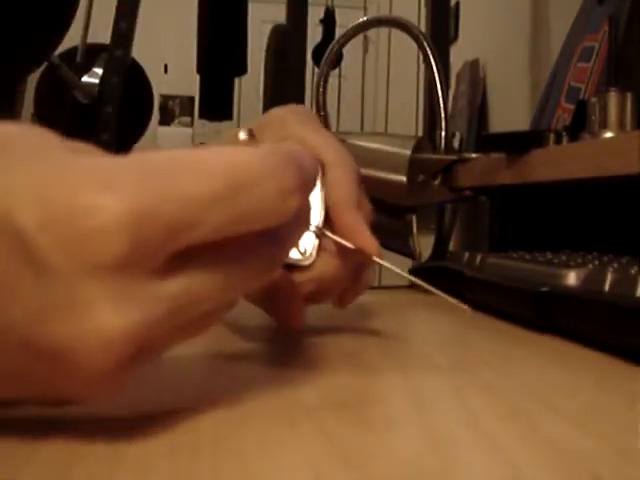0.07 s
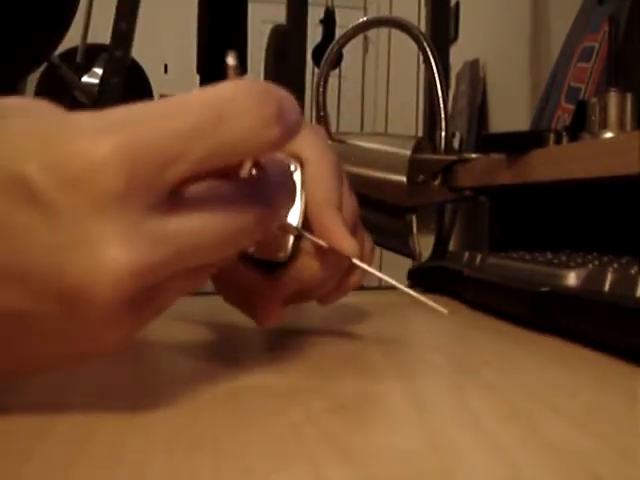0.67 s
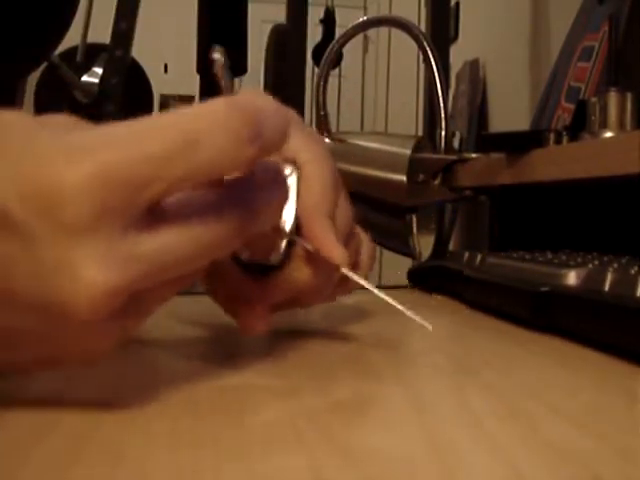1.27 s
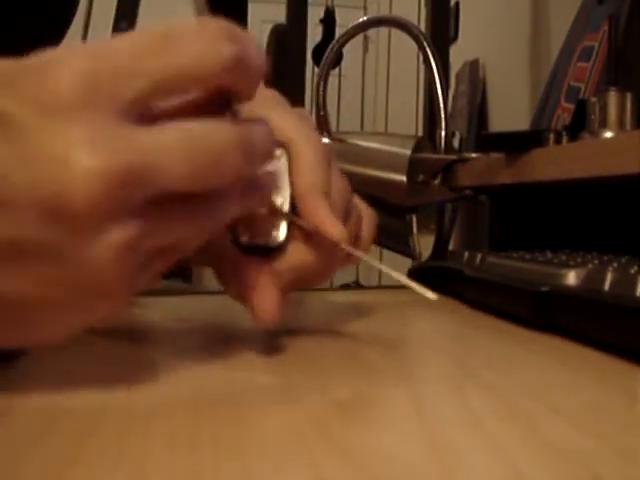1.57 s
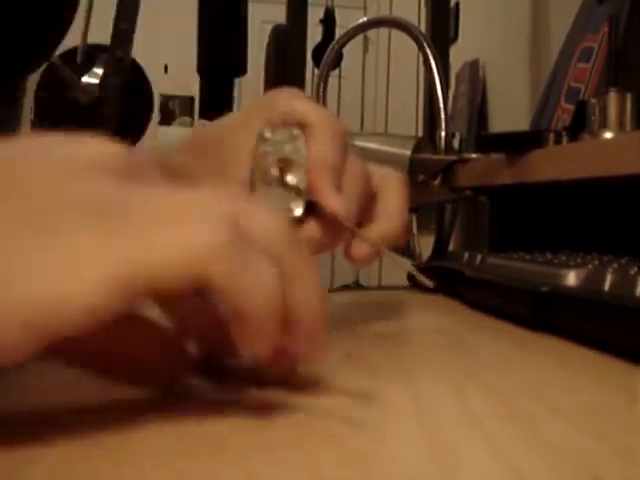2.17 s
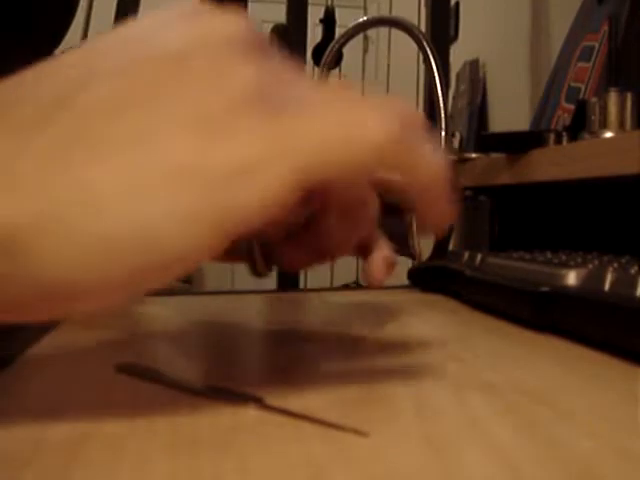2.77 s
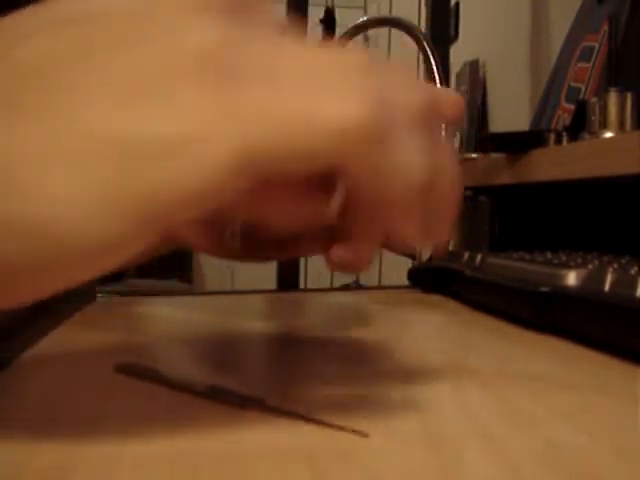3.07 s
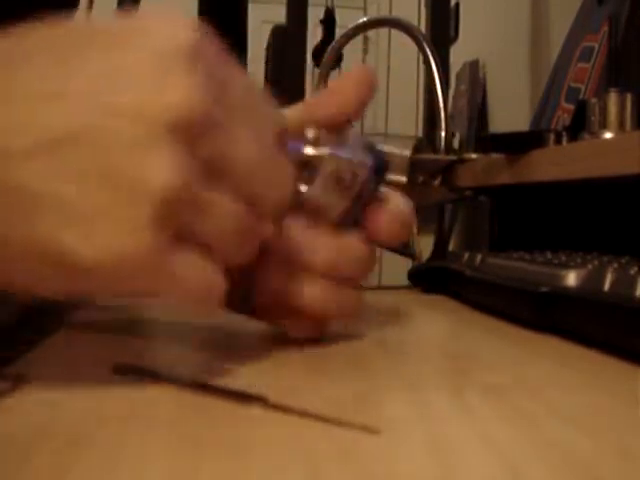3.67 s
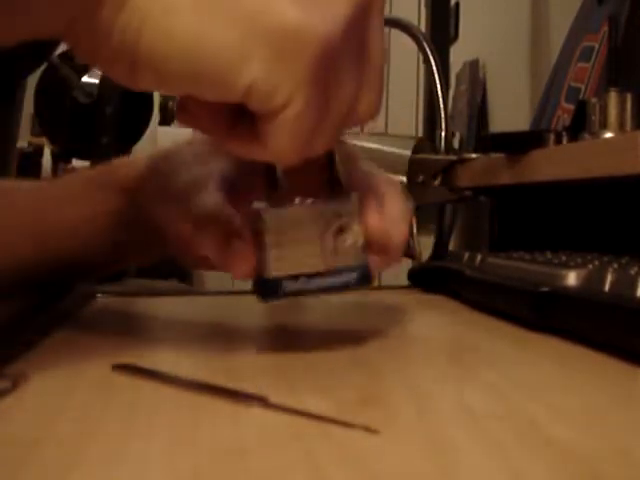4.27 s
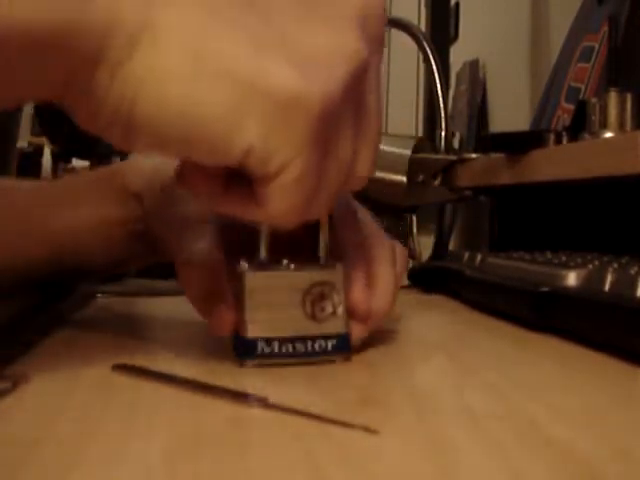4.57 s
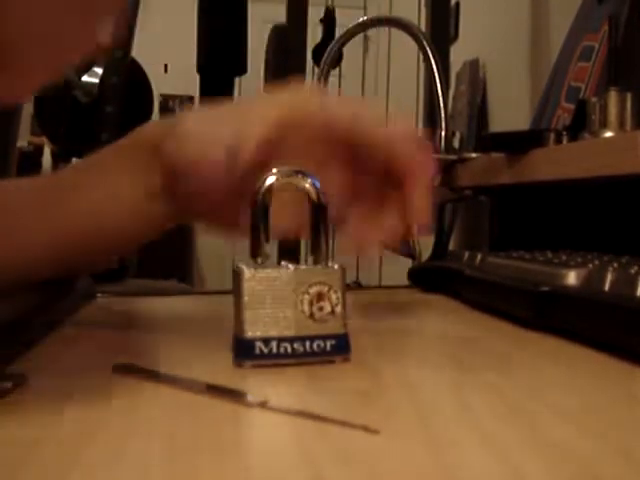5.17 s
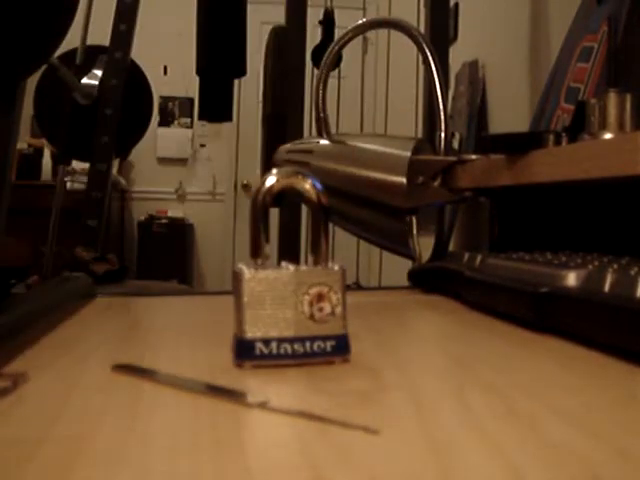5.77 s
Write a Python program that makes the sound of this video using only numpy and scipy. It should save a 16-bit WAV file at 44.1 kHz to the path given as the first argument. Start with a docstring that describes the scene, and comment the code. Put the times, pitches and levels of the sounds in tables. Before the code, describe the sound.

Faint metallic ticks and tiny scrapes come from a pick working the pins of a padlock. The pick clatters onto a wooden desk, the shackle springs open with a sharp, loud snap, and a small wrench bounces and rattles to rest. The lock is then stood on the desk with a dull knock. The microphone is close, in a quiet, slightly echoing room with a humming fan.

```python
"""A padlock is picked on a wooden desk, just in front of a small camera in a quiet room.
Pins tick and scrape, the pick drops, the shackle springs open, the tension wrench rattles to rest,
and the lock is stood on the desk. Each impact is a click and brief chatter that excite damped modes.
A fan hums and the camera whines and ticks faintly; its fast limiter compresses the loudest hits,
so the room's reverberation swells up behind them."""
import sys
import numpy as np
from scipy import signal
from scipy.fft import rfft, irfft
from scipy.io import wavfile

SR = 44100
rng = np.random.default_rng(int(sys.argv[2]) if len(sys.argv) > 2 else 0)


def generate_wav(signal):
    """Clip the signal to [-1, 1] and save it as 16-bit WAV at the path in sys.argv[1]."""
    frames = np.transpose(np.atleast_2d(signal))
    scaled = np.clip(frames, -1, 1) * 32767
    pcm = np.round(scaled).astype(np.int16)
    wavfile.write(sys.argv[1], SR, pcm)


N = 265923

# Single pin clicks: t/s, relative level/dB, tilt/(dB/octave), pin f/Hz
PIN_TICKS = [(0.1504, -41, 1, 6760), (.3078, -39.5, 0, 4560), (.4596, -32, 2.5, 4770),
             (.8612, -36, -4.5, 4500), (1.1173, -40, 1, 4810), (1.1458, -22, -0.8, 4450),
             (1.5511, -21.5, -3.5, 5240), (2.8652, -34, -4, 4910)]
# Drags through the keyway: t/s, length/s, relative level/dB, tilt/(dB/octave), pin f/Hz
PIN_SCRAPES = [(0.4267, .018, -38, 1, 4700), (1.658, .006, -40.5, -2.5, 7540), (1.767, .055, -38, 5, 8000),
               (2.92, .02, -33, 1, 4800)]
# Contact spectrum of a pin: f/Hz, relative level/dB
PIN_FORCE = [(60, -22), (300, -12.5), (1000, -0.5), (1700, -3), (2600, -12.5), (3400, -4), (4400, 2.5),
             (6300, 0), (8500, -3), (10000, -7.5)]
# Modes of the lock body: f/Hz, relative level/dB, T60/s
LOCK_MODES = [(4270, -6.5, 0.022), (4900, -10, .025), (7430, -49, 0.026), (8000, -22, 0.017),
              (8460, -1, 0.013), (9730, 7, 0.014)]


def pins(catch_gap_s=.015, jitter_s=.001, uneven_db=1.5, tick_t60=.014, catch_t60=.022):
    """Stick-slip friction: the tool catches almost periodically; catches and clicks ring pin and lock."""
    rows = [(s, db, tilt, tick_t60, hz) for s, db, tilt, hz in PIN_TICKS]
    for start, length, db, tilt, hz in PIN_SCRAPES:
        catches = np.arange(start, start + length, catch_gap_s)
        for s, (late, strong) in zip(catches, rng.standard_normal((10, 2))):
            rows.append((s + jitter_s * late, db + uneven_db * strong, tilt, catch_t60, hz))
    return spot_impacts(rows, PIN_FORCE, LOCK_MODES, ring_db=-11.5, chatter=3.8,
                        spot_db=-.5, spot_t60=.016)


# The latch lets go and the shackle hits its stop: t/s, level/dB, tilt/(dB/octave), chatter T60/s
SHACKLE_SNAPS = [(2.5131, -22, -8, 0.013), (2.5178, -15, 13, 0.025), (2.5216, 4.5, 2.5, 0.014),
                 (2.5248, -3, 7.5, 0.0055)]
# Contact spectrum of the shackle: f/Hz, relative level/dB
SHACKLE_FORCE = [(60, -34), (400, -29), (1200, -7), (2200, 0.5), (3500, -5), (5100, 1), (6200, -7),
                 (7500, 2.5), (8200, -2), (9000, -8), (10000, -22.5)]


def shackle(ring_db, chatter):
    """Release of elastic energy: the sprung shackle strikes the lock body in a tight cluster of hits."""
    return impacts(SHACKLE_SNAPS, SHACKLE_FORCE, LOCK_MODES, ring_db, chatter)


# Pick bounces: t/s, tip level/dB, handle delay/s, handle level/dB, handle tilt/(dB/octave)
PICK_BOUNCES = [(2.1774, 2, .0062, 8, -0.5), (2.204, -13, 0.01, -13.5, 2.5), (2.226, -22, 0.013, -9.5, 0),
                (2.2564, -13, 0.0029, -13.5, 0.5), (2.28, -13, .009, -16, -4.5)]
# Contact spectrum of the pick: f/Hz, relative level/dB
PICK_FORCE = [(60, -26), (150, -17), (250, -4.5), (450, 2), (1000, 5), (1900, 8), (3200, 4), (4800, 1),
              (6500, -3), (7700, -12), (8700, -13), (10000, -8.5)]
# Modes of the pick and of the desk: f/Hz, relative level/dB, T60/s
PICK_MODES = [(3575, -21, .1), (4470, -16, .08), (5965, -8, .15), (8610, -12, .15)]
DESK_MODES = [(349.4, -15, 0.17), (506, -15, 0.065), (603, -7.5, 0.048), (933, -10, 0.062),
              (1017, -7, 0.051), (1420, -7.5, 0.071), (1927, -1, 0.027), (2480, -6, 0.031),
              (3214, -4, 0.019)]


def dropped_pick(tip_t60=.053, handle_t60=.021, tilt_db_per_octave_per_s=75):
    """Two-point impact: the springy tip lands and buzzes, then the handle slaps down."""
    rows, dropped_s = [], PICK_BOUNCES[0][0]
    for s, tip_db, delay, handle_db, handle_tilt in PICK_BOUNCES:
        tip_tilt = tilt_db_per_octave_per_s * (s - dropped_s)  # the buzz thins as the bounces get lower
        rows.append((s, tip_db, tip_tilt, tip_t60))
        rows.append((s + delay, handle_db, handle_tilt, handle_t60))
    return rattle(rows, PICK_FORCE, DESK_MODES + PICK_MODES, ring_db=-18.5, chatter=9.8,
                  after_db=-4, after_s=.0066)


# The tension wrench tumbles and finally tips over: t/s, level/dB, tilt/(dB/octave)
WRENCH_BOUNCES = [(3.2288, -11, -2), (3.2545, -19.5, -5.5), (3.267, -20.5, -2.5), (3.2852, -13.5, 1.5),
                  (3.3213, -18, 8), (3.3487, -14.5, -1), (3.3965, -21.5, -1.5), (3.5452, -25.5, -3),
                  (3.593, -30.5, -0.5)]
# Contact spectrum of the wrench: f/Hz, relative level/dB
WRENCH_FORCE = [(60, -31), (200, -24.5), (550, -0.5), (1000, 2.5), (1900, 4), (3300, 5.5), (4900, 6),
                (5800, -2), (7600, -2.5), (8600, -4.5), (10000, -7)]
# Modes of the wrench: f/Hz, relative level/dB, T60/s
WRENCH_MODES = [(4270, -24, 0.45), (5130, -11, 0.14), (6363, -6, 0.05), (9475, 4.5, 0.073), (9835, 3, 0.08)]


def tension_wrench(bounce_t60=.021, rock_start_s=3.419, first_hop_s=.027, restitution=.875):
    """Inelastic collision: the wrench bounces, then rocks, each hop shorter and weaker than the last."""
    rows = [(*bounce, bounce_t60) for bounce in WRENCH_BOUNCES]
    first_db, loss_db, tilt_db, rock_t60 = -20.5, 1.15, 1.4, .056
    s = rock_start_s
    for hop in range(6):
        rows.append((s, first_db - loss_db * hop, tilt_db, rock_t60))
        s += first_hop_s * restitution ** hop
    return rattle(rows, WRENCH_FORCE, DESK_MODES + WRENCH_MODES, ring_db=-11.5, chatter=2.3,
                  after_db=-8, after_s=.009)


# The held pick, the wrench settling, the two edges of the lock's base, a last bump and scuff:
# t/s, level/dB, tilt/(dB/octave), chatter T60/s, spot f/Hz
KNOCKS = [(2.0452, -13, 7, 0.051, 860), (3.5465, -33.5, 3, 0.06, 644), (3.602, -35, 2, 0.038, 630),
          (4.6046, 5, 1, 0.033, 273.7), (4.6078, -1, 2.5, 0.015, 943), (5.408, -23.5, 5, 0.031, 682),
          (5.455, -35, 6.5, 0.48, 676)]
# Contact spectrum of a dull knock on wood: f/Hz, relative level/dB
KNOCK_FORCE = [(60, -18), (170, -36.5), (245, -2), (420, 0.5), (620, 5), (1200, -5), (1500, -12),
               (2200, -16), (3800, -25), (5200, -40.5), (10000, -53)]


def desk_knocks(ring_db, chatter, spot_db):
    """Plate vibration: a knock excites the desk's modes and a note particular to the struck spot."""
    return spot_impacts(KNOCKS, KNOCK_FORCE, DESK_MODES, ring_db, chatter, spot_db, spot_t60=.052)


# Jolts of the desk top: t/s, relative peak level/dB
JOLTS = [(2.175, -34), (2.239, -31), (2.522, -25), (2.864, -31), (3.228, -36), (3.284, -36), (4.605, -35)]


def desk_jolts(hz=68, t60=.021, gain_db=-3):
    """Structure-borne sound: the desk top gives one heavily damped heave under the camera per jolt."""
    out, t = np.zeros(N), np.arange(SR // 4) / SR
    heave = np.sin(2 * np.pi * hz * t) * 1000 ** (-t / t60)
    for s, db in JOLTS:
        add(out, s, amp(db + gain_db) * heave / heave.max())
    return out


def impact(level_db, tilt_db, chatter_t60, force, modes, ring_db, chatter, uneven_db=3):
    """Modal superposition: a click and micro-contacts (`chatter` times its size) plus decaying modes."""
    t = np.arange(SR // 6) / SR
    hz, mode_db, t60 = np.transpose(modes)[:, :, None]
    contact = rng.standard_normal(len(t)) * amp(-60 * t / max(chatter_t60, .002))
    contact /= np.linalg.norm(contact)
    contact[0] += 1 / chatter  # the click
    rings = np.cos(2 * np.pi * (hz * t + rng.random(hz.shape))) * amp(-60 * t / t60)
    rings /= np.linalg.norm(rings, axis=1, keepdims=True)
    position_db = uneven_db * rng.standard_normal(hz.shape)  # where the blow lands weights each mode
    ring = (rings * amp(ring_db + mode_db + position_db)).sum(0)
    sound = colour(contact + ring, force, tilt_db)
    onset_rms = np.sqrt(np.mean(sound[:round(.004 * SR)] ** 2))
    return amp(level_db) * sound / onset_rms


def impacts(rows, force, modes, ring_db, chatter):
    """Linear superposition: successive impacts on the same modes add."""
    out = np.zeros(N)
    for s, *stroke in rows:
        add(out, s, impact(*stroke, force, modes, ring_db, chatter))
    return out


def spot_impacts(rows, force, modes, ring_db, chatter, spot_db, spot_t60):
    """Local resonance: each impact also rings one mode of the pin or spot it touches."""
    out = np.zeros(N)
    for s, *stroke, spot_hz in rows:
        add(out, s, impact(*stroke, force, modes + [(spot_hz, spot_db, spot_t60)], ring_db, chatter))
    return out


def rattle(rows, force, modes, ring_db, chatter, after_db, after_s, after_taps=2):
    """Secondary impacts: the far end of a thin strip slaps down after every bounce."""
    out = impacts(rows, force, modes, ring_db, chatter)
    for s, level_db, tilt_db, chatter_t60 in rows:
        for late, weak in rng.random((after_taps, 2)):
            tap_db = min(level_db, -20) + after_db - 6 * weak  # the light end cannot hit hard
            tap = impact(tap_db, tilt_db, chatter_t60, force, modes, ring_db, chatter)
            add(out, s + .002 + after_s * late, tap)
    return out


# Reverberation time: f/Hz, T60/s
ROOM_T60 = [(250, 0.43), (600, 0.32), (1500, 0.5148), (4000, 0.52), (8000, 0.43)]
# Reverberant spectrum against the sound fed to the room: f/Hz, level/dB
ROOM_SPECTRUM = [(100, -16.5), (250, -6), (700, -7.5), (1500, -17), (4000, -21.5), (8000, -16)]


def room(x, build_s=.022, gap_s=.006, reflections_per_s=5000):
    """Reverberation: wall reflections build up after a gap, then each band decays at its own rate."""
    reflections = rng.choice([-1., 1.], SR) * (rng.random(SR) < reflections_per_s / SR)
    hz, t, bands = signal.stft(reflections, SR, nperseg=256)
    decay = 1000 ** (-t / curve(ROOM_T60, hz)[:, None])
    tail = signal.istft(bands * decay, SR, nperseg=256)[1][:SR]
    tail *= np.clip((np.arange(SR) / SR - gap_s) / build_s, 0, 1)
    response = colour(tail / np.linalg.norm(tail), ROOM_SPECTRUM)
    return signal.fftconvolve(x, response)[:N]


# Fan noise and microphone hiss: f/Hz, relative spectral level/dB
HUSH_SPECTRUM = [(30, -26), (85, -30.5), (130, -14), (240, -1), (380, -2.5), (650, -3.5), (930, -6),
                 (1150, -7), (1300, -15), (1650, -16.5), (2300, -17), (3400, -23), (5300, -25),
                 (8700, -29.5), (10000, -19)]
# Fan tones and the camera's whine: f/Hz, rms deviation/Hz, level/dB
WHINES = [(243.5, 7.74, -57), (530, 11.34, -57), (1003, 2.93, -59.5), (1066, 3.92, -54), (1190, 3.25, -61),
          (8020, 24, -68), (9633, 22, -58), (10520, 110, -94)]


def hush_and_whines(hush_db=-43, waver_hz=6):
    """Random frequency modulation: fan and camera tones waver over steady broadband noise."""
    hz = np.fft.rfftfreq(N, 1 / SR)
    out = amp(hush_db) * shaped_noise(amp(curve(HUSH_SPECTRUM, hz)))
    for centre, swing, db in WHINES:
        drift = shaped_noise(1 / (1 + (hz / waver_hz) ** 2))
        phase = 2 * np.pi * np.cumsum(centre + swing * drift) / SR
        out += amp(db) * np.sqrt(2) * np.sin(phase)
    return out


# The camera's two ticks per frame: t/s within the frame, level/dB
FRAME_TICKS = [(.0125, -58.5), (0.0293, -45)]
# Spectrum of one tick: f/Hz, relative level/dB
TICK_SPECTRUM = [(300, -12), (1400, -17.5), (1950, 9.5), (2600, 2), (3500, -5), (10000, -28)]


def camera_ticks(frame_hz=29.995, uneven_db=2):
    """Periodic interference: the camera's electronics add a faint pulse train at the frame rate."""
    out = np.zeros(N)
    tick = colour(signal.unit_impulse(512), TICK_SPECTRUM)
    tick /= np.sqrt(np.mean(tick[:SR // 1000] ** 2))
    for start, db in FRAME_TICKS:
        for s in np.arange(start, N / SR, 1 / frame_hz):
            add(out, s, amp(db + uneven_db * rng.standard_normal()) * tick)
    return out


def amp(db):
    """Amplitude ratio of a level in decibels."""
    return 10 ** (np.asarray(db) / 20)


def curve(points, hz):
    """Linear interpolation of (f/Hz, value) points on a log-frequency axis."""
    f, value = np.transpose(points)
    return np.interp(np.log(hz + 1), np.log(f + 1), value)


def add(mix, s, sound):
    """Superposition of a sound on the mix from time s."""
    part = mix[max(round(s * SR), 0):][:len(sound)]
    part += sound[:len(part)]


def shaped_noise(gain):
    """Spectral weighting of white noise, scaled to unit rms."""
    noise = irfft(rfft(rng.standard_normal(N)) * gain, N)
    return noise / np.sqrt(np.mean(noise ** 2) + 1e-20)


def colour(x, spectrum, tilt_db=0, size=2048):
    """Minimum-phase filtering by a spectrum, tilted by tilt_db per octave above 400 Hz."""
    hz = abs(np.fft.fftfreq(size, 1 / SR))
    octaves = np.log2(np.maximum(hz, 400) / 2000)
    log_gain = np.log(amp(curve(spectrum, hz) + tilt_db * octaves))
    taps = np.fft.ifft(np.exp(np.conj(signal.hilbert(log_gain)))).real
    return signal.fftconvolve(x, taps[:size // 2])[:len(x)]


def low_pass(x, hz):
    """Steep band limiting by a windowed sinc."""
    return signal.oaconvolve(x, signal.firwin(401, hz, window=("kaiser", 8), fs=SR), "same")


def scene():
    """Direct and reverberant fields add over the background; each source has its own room level."""
    clicks = amp(2) * pins()
    pick = dropped_pick()
    snap = shackle(ring_db=-55, chatter=3.9)
    wrench = tension_wrench()
    knocks = desk_knocks(ring_db=-15, chatter=4.4, spot_db=-1)
    # Over all directions a heavy blow's chatter averages out, so the room gets a smoother spectrum.
    diffuse_snap = shackle(ring_db=-19, chatter=.62)
    diffuse_knocks = desk_knocks(ring_db=-14.5, chatter=.36, spot_db=4)
    reverb = room(amp(-.5) * clicks + amp(-2.5) * pick + amp(4.5) * wrench
                  + amp(-1) * diffuse_snap + amp(-2) * diffuse_knocks)
    direct = clicks + pick + snap + wrench + knocks
    return (direct + reverb + desk_jolts() + hush_and_whines() + camera_ticks())[None]


def record(dry, threshold_db=-2, recovery_db_per_s=800, attack_s=.0001, ceiling=.72, mic_edge_hz=10050):
    """Peak limiting: the gain ducks on each loud hit, and whatever still exceeds the ceiling clips."""
    x = low_pass(dry[0], mic_edge_hz)
    over_db = np.maximum(20 * np.log10(abs(x) + 1e-9) - threshold_db, 0)
    recovery_db = np.arange(N) / SR * recovery_db_per_s
    held_db = np.maximum.accumulate(over_db + recovery_db) - recovery_db
    pole = np.exp(-1 / (attack_s * SR))
    reduction_db = signal.lfilter([1 - pole], [1, -pole], held_db)
    x = np.clip(x * amp(-reduction_db), -ceiling, ceiling)
    x = np.clip(low_pass(x, mic_edge_hz), -ceiling, ceiling)  # the filter's overshoot clips again
    return low_pass(x, hz=16000)[None]


dry = scene()
out = record(dry)
generate_wav(out)
```